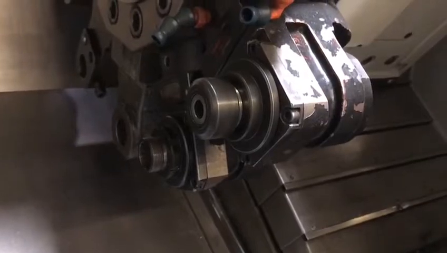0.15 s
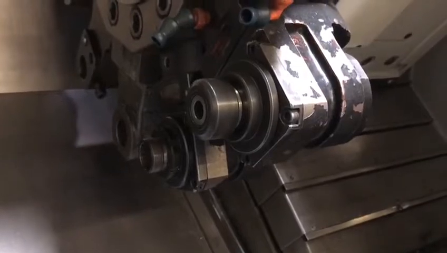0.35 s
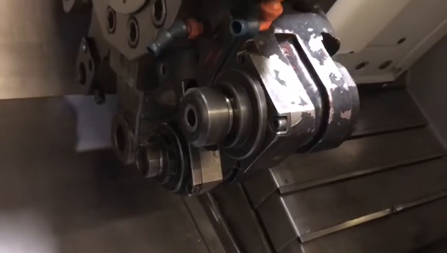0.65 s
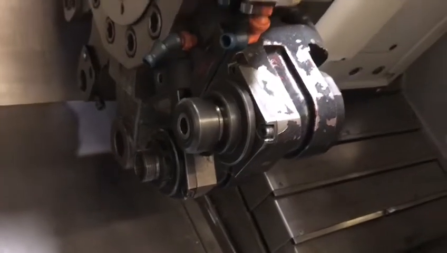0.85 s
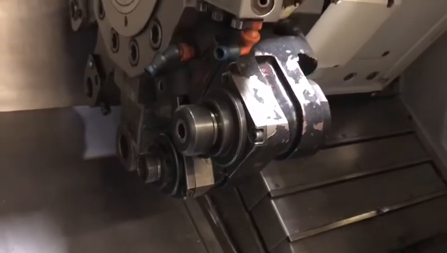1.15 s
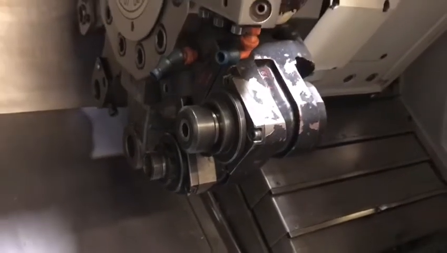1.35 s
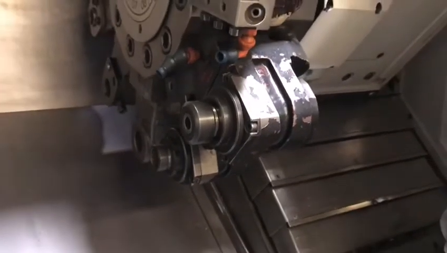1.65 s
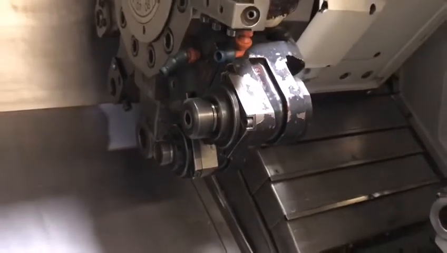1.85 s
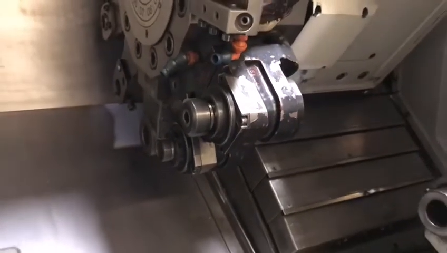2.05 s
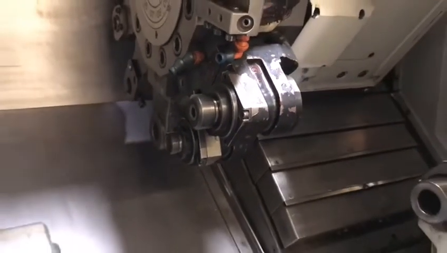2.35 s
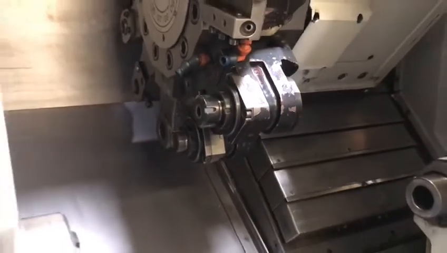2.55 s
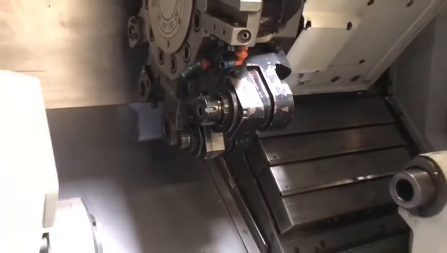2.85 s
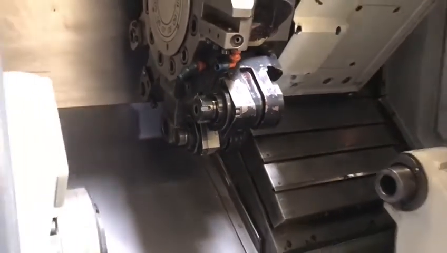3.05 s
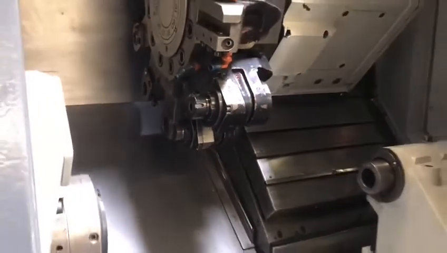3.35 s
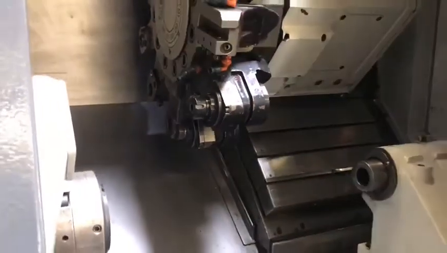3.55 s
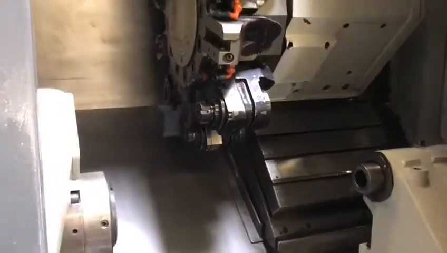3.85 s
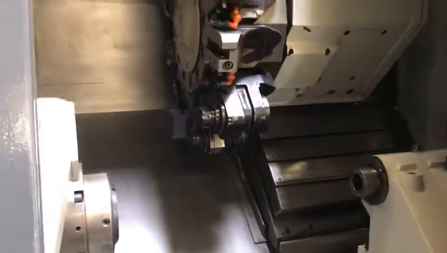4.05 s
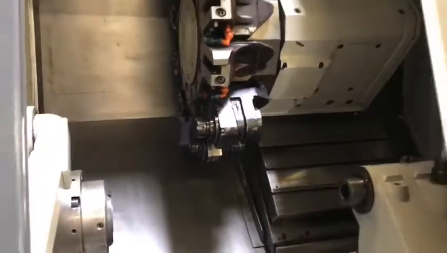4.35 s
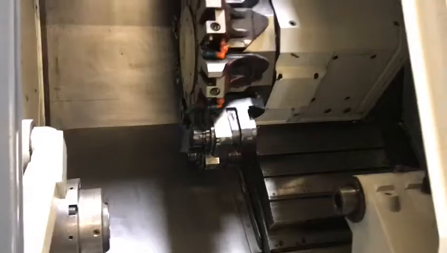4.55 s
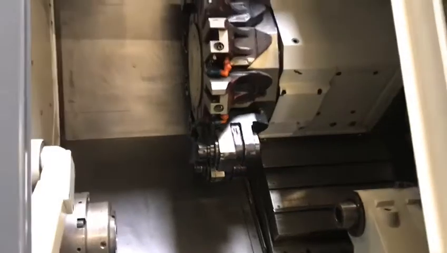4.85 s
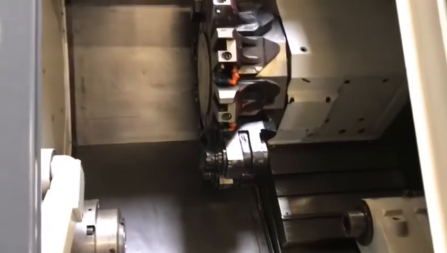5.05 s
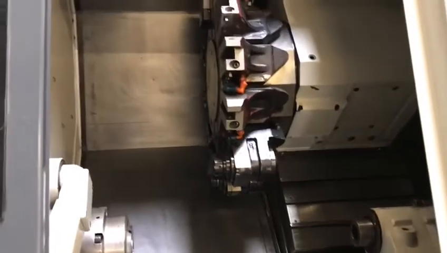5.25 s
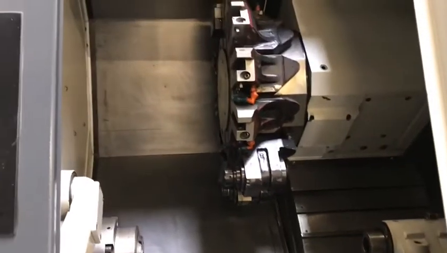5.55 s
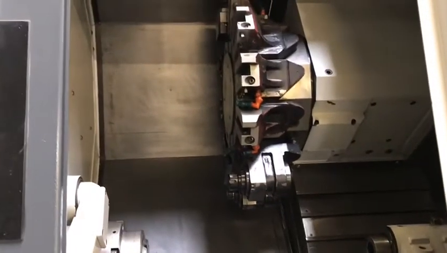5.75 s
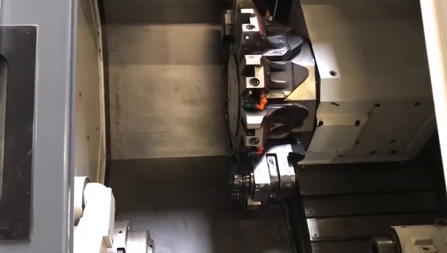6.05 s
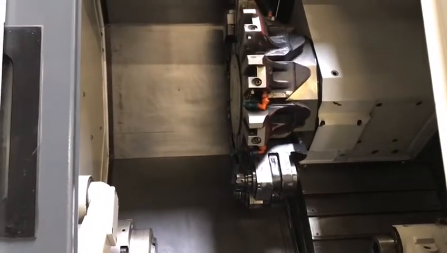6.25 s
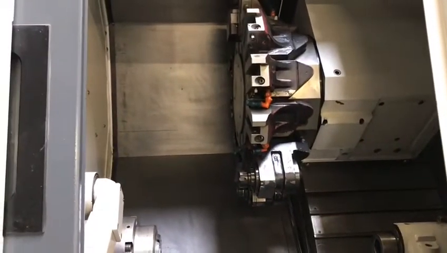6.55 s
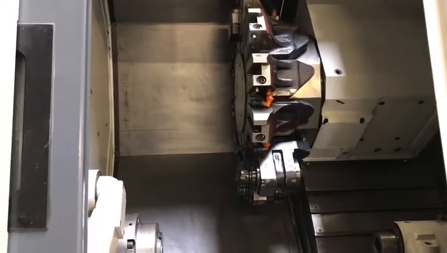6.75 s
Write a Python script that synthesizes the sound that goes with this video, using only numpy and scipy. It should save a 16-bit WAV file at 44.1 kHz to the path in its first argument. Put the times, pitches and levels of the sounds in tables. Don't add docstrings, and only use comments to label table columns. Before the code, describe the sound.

Inside a metal lathe cabin, a geared tool drive roars and whines loudly with a brief buzzing rattle. The microphone backs away, the whine sharpening, until the drive quickly moans to rest with a soft low brake thud. A steady air hiss with faint whistles remains. A sharp latch knock follows, then a valve snap as the air stops, a faint relay click, and continuing pump, fan and mains hum.

```python
import sys
import numpy as np
from scipy import signal
from scipy.io import wavfile
from scipy.ndimage import uniform_filter1d

SR = 44100
rng = np.random.default_rng(int(sys.argv[2]) if len(sys.argv) > 2 else 0)


def master_out(mix):
    frames = np.transpose(np.atleast_2d(mix))
    ceiling = np.clip(frames, -1, 1)
    pcm = np.round(ceiling * 32767).astype(np.int16)
    wavfile.write(sys.argv[1], SR, pcm)


def invert_db(level):
    return 10 ** (np.asarray(level, dtype=float) / 20)


N = 304731
HOP = 256
MOUTH_S, MOUTH_LEN_S = 0.77, 0.35
STOP_S, COAST_S = 2.345, 0.225


def tool_drive(t):
    return bearing_roar() + gear_tones(t) + mesh_whine(t) + cover_rattle(t) + coasting_moans(t)


def bearing_roar():
    # pitch_hz, level_db [dB per Hz]
    roar_close = [(24, -48), (40, -28), (341, -7.5), (590, 4), (665, -5.5), (928, 7.5), (1120, -18),
                  (1210, 3), (1610, 1), (2300, -10), (2530, -14.5), (3520, -6), (5160, -12.5), (10800, -22),
                  (11900, -30), (15400, -67), (22000, -120)]
    # pitch_hz, level_db [dB per Hz]
    roar_far = [(24, -54), (40, -38), (333, -8), (394, -16.5), (824, -9.5), (928, -12.5), (1100, -17),
                (1210, -13), (1610, -24.5), (2190, -2.5), (2350, 3.5), (2530, -1.5), (3610, -6.5),
                (11100, -22.5), (11900, -45), (15400, -73), (22000, -120)]
    # pitch_hz, width_hz, lift_db
    housing = [(420, 39, 2.5), (910, 350, -2), (1240, 90, -3), (1835, 70, 7.5), (2350, 200, 1),
               (2680, 67, 3), (3410, 300, 2), (3620, 320, 2), (10960, 320, 9)]
    far_inside, far_outside = 0.41, 0.53
    level_db, spread_share = -17.5, 0.9
    speed_power, dull_db = 0.77, -6.5
    t = frame_times()
    far = far_inside + (far_outside - far_inside) * outside(t)
    roar_db = level_db + spread_share * spread_db(t) + speed_power * 20 * np.log10(speed(t))
    octaves = np.log2(np.fft.rfftfreq(4 * HOP, 1 / SR) / 1400 + 0.055)[:, None]
    dulling_db = octaves * dull_db * (1 - speed(t)) ** 2
    colour_db = (1 - far) * colour(roar_close, housing) + far * colour(roar_far, housing)
    return noise(colour_db + roar_db + dulling_db, patchy_db=0.22, flicker_db=1.01, streak_db=2.0)


def gear_tones(t):
    # pitch_hz, level_db
    gears_close = [(65.3, -46), (129.9, -45), (259.7, -49.5), (391.6, -35), (456.9, -43), (555.8, -49),
                   (591.5, -32), (620.4, -47), (769.1, -38), (849.2, -35.5), (914.5, -38), (947.5, -32.5),
                   (1012.1, -36.5), (1201.1, -35.5), (1240.9, -34.5), (1501.9, -39), (1567.2, -48),
                   (1697.8, -40), (1763.0, -32.5), (1958.8, -35.5), (2122.4, -33.5), (2285.2, -42)]
    # pitch_hz, level_db
    gears_far = [(65.3, -53), (101.6, -54), (130.5, -50), (259.1, -46), (391.0, -37), (424.6, -46.5),
                 (456.2, -47), (528.2, -45), (591.5, -40), (619.8, -42.5), (881.5, -42), (946.8, -33.5),
                 (1012.1, -39.5), (1201.8, -39.5), (1239.5, -50), (1404.4, -44), (1468.3, -41.5),
                 (1859.3, -40.5), (2154.0, -60), (2284.5, -39.5)]
    # pitch_hz, level_db
    gears_high = [(2415.8, -49.5), (2611.6, -49), (2742.1, -41.5), (3100.8, -46.5), (3133.8, -42),
                  (3166.1, -57), (3232.0, -46.5), (3402.2, -41.5), (3656.6, -40.5), (3688.2, -40),
                  (5680.1, -47.5), (7509.7, -50), (7714.3, -51), (7752.6, -57), (8158.4, -48.5),
                  (8307.1, -53), (9089.7, -49), (9525.8, -73)]
    close = sum(tone(hz, db - 0.1, waver=0.6, rate_hz=24) for hz, db in gears_close)
    far = sum(tone(hz, db + 3.0, waver=0.41, rate_hz=18) for hz, db in gears_far)
    high = sum(tone(hz, db + 5.5, waver=0.7, rate_hz=18) for hz, db in gears_high)
    turn = outside(t) * np.pi / 2
    strength = invert_db(spread_db(t)) * speed(t) ** 2.8
    return strength * (np.cos(turn) * close + np.sin(turn) * far + high)


def mesh_whine(t):
    # time_s, level_db
    mesh = [
        (0, -28),
        (.3, -26.5),
        (.97, -28),
        (1.1, -22),
        (1.25, -20.5),
        (1.8, -21.5),
        (2.05, -24),
        (2.4, -24.5),
    ]
    unload_db, unload_s = -10.5, 0.027
    level_db = curves(mesh, t)[0] + unload_db * np.clip((t - STOP_S) / unload_s, 0, 1)
    return tone(2350.2, level_db, waver=0.07, rate_hz=25) * speed(t)


def cover_rattle(t):
    # start_s, end_s, from_hz, to_hz, level_db
    rattle = (0.3, 1.18, 905, 940, -30)
    return passing(rattle, t, waver=3.0, rate_hz=70)


def coasting_moans(t):
    # start_s, end_s, from_hz, to_hz, level_db
    moans = [
        (2.34, 2.45, 560, 515, -34),
        (2.44, 2.55, 530, 558, -34.5),
    ]
    return sum(passing(row, t, waver=0.29, rate_hz=71) for row in moans)


def air_purge(t):
    # pitch_hz, level_db [dB per Hz]
    jet_hiss = [(88, -43), (150, -8), (190, -26), (250, -5.5), (312, -20), (403, -25), (458, -18.5),
                (710, -16), (778, -17.5), (885, -10.5), (1650, -11.5), (1770, -8.5), (4420, -7),
                (11000, -20), (11900, -22.5), (15400, -65), (22000, -120)]
    # pitch_hz, width_hz, lift_db
    cabin = [(550, 49, 11.5), (6200, 490, 3), (1013, 58, 6.5), (2450, 60, 5.5), (2716, 37, 7),
             (3700, 150, 2), (4410, 980, 2.5), (5000, 440, -2), (7060, 580, 2.5), (7880, 520, -4),
             (8700, 700, 4.5), (10300, 520, -1.5), (11070, 370, 3)]
    # start_s, end_s, from_hz, to_hz, level_db
    whistles = [(3.82, 4.02, 3450, 3505, -46), (4.0, 4.26, 3580, 3645, -44), (2.6, 4.1, 2085, 2090, -55),
                (3.05, 4.5, 2395, 2450, -54), (3.8, 4.5, 3990, 3975, -54), (4.55, 5.52, 1785, 1812, -55),
                (3.4, 4.8, 2580, 2645, -54)]
    level_db, spread_share = -27, 1.115
    shut_s, shut_db_per_s, leak_db, leak_db_per_s = 5.51, -450, -21, -70
    shut = np.maximum(frame_times() - shut_s, 0)
    flow_db = np.maximum(shut_db_per_s * shut, leak_db + leak_db_per_s * shut)
    field_db = colour(jet_hiss, cabin) + level_db + spread_share * spread_db(frame_times()) + flow_db
    jet = noise(field_db, patchy_db=0.6, flicker_db=0.4, streak_db=2.3)
    return jet + sum(passing(row, t, waver=0.45, rate_hz=30) for row in whistles)


def knocks():
    # time_s, peak_db, ring_hz, fade_s [time to fall 60 dB], crack_share [0-1]
    hits = [(2.613, -28, 78, .09, .02), (4.9635, -19.5, 1150, .018, .2), (4.9633, -21, 3250, .014, .3),
            (4.965, -28, 520, .04, .1), (4.970, -28, 290, .04, 0), (4.966, -36, 130, .06, 0),
            (5.5832, -21, 3900, .006, .3), (5.5836, -26, 2900, .006, .1), (5.5832, -28, 5400, .006, .3),
            (5.5832, -24, 7000, .007, .2), (5.5832, -29, 11200, .006, .3), (5.5844, -28, 1400, .008, .1),
            (5.999, -36, 7300, .008, .6), (6.0025, -37, 9200, .007, .6), (6.058, -36, 400, .02, .05)]
    out, u = np.zeros(N), np.arange(6000) / SR
    for s, db, hz, fade_s, crack_share in hits:
        crack = rng.standard_normal(len(u)) * invert_db(-60 * u / 0.013)
        ring = (1 - crack_share) * np.sin(2 * np.pi * hz * u) + crack_share * crack
        onset = np.minimum(u * hz * 2, 1)
        at = round(s * SR)
        out[at:at + len(u)] += invert_db(db - 60 * u / fade_s) * ring * onset
    return out


def pump(t):
    # multiple, level_db, loudest_s, half_width_s, lift_db
    pump_low = [(1, -68, 2.6, 1.9, 25), (2, -59, 4.25, .9, 13), (3, -54, 3.3, .8, 2),
                (4, -74, 3.7, 1.3, 28)]
    # multiple, level_db
    pump_orders = [(5, -59), (6, -53), (7, -54), (8, -63), (10, -61), (11, -73), (14, -67), (15, -72),
                   (16, -64), (17, -71), (19, -80), (21, -77), (25, -81), (26, -78)]
    pump_hz = 385.23
    beat_hz, beat_top_s, beat_depth = 1.85, 5.8, 0.8
    one, two, three, four = (tone(pump_hz * round(k), spot_db(t, *spot), waver=0.12, rate_hz=8)
                             for k, *spot in pump_low)
    beat = 1 + beat_depth * np.cos(2 * np.pi * beat_hz * (t - beat_top_s))
    high = sum(tone(pump_hz * k, db, waver=0.15, rate_hz=5) for k, db in pump_orders)
    return one + two + three * beat + four + high


def fans(t):
    # multiple, level_db
    fan_orders = [(2, -60), (3, -55), (4, -68), (5, -71), (6, -73), (7, -78), (8, -74), (9, -78)]
    # pitch_hz, level_db, spot_s, half_width_s, lift_db
    blower_tones = [
        (258.9, -43, 1.2, 1.6, -2),
        (408.5, -54.5, 1.5, 3.1, 10),
        (821.3, -70, 2.5, 1.6, 27),
        (821.3, -50, 5.3, 1.0, 6),
    ]
    # pitch_hz, level_db
    hums = [(59, -63), (100, -61), (119.8, -54), (225, -56.5), (241, -58.5), (695.8, -61.5), (775.9, -55.5),
            (1215, -60.5), (1391, -57), (1811, -65), (3461.5, -54), (3691, -75), (3822, -72),
            (4614.8, -64.5), (5364, -73), (6922, -68), (7977, -78), (8269, -83), (8446, -79), (8999, -77)]
    fan_hz = 1111.2
    servo = sum(tone(fan_hz * k, db, waver=0.18, rate_hz=5) for k, db in fan_orders)
    blower = sum(tone(hz, spot_db(t, *spot), waver=0.29, rate_hz=12) for hz, *spot in blower_tones)
    hum = sum(tone(hz, db, waver=0.39, rate_hz=8) for hz, db in hums)
    return servo + blower + hum


def shop_noise():
    # pitch_hz, level_db [dB per Hz]
    shop = [(12, -53), (20, -25), (114, -6), (174, -13), (253, -9.5), (468, -14), (799, -10.5),
            (889, -13.5), (1730, -13.5), (2270, -17.5), (2880, -22), (3380, -21), (3670, -21), (11000, -32),
            (11900, -35), (15400, -74), (22000, -120)]
    # pitch_hz, width_hz, lift_db
    panels = [(1030, 150, 3.5), (1550, 150, 0.5), (2600, 300, 2.5), (1830, 280, -5), (4800, 300, 0),
              (7640, 520, -3), (11000, 500, 4)]
    level_db = -39 + 0.91 * spread_db(frame_times())
    return noise(colour(shop, panels) + level_db, patchy_db=1.0, flicker_db=0.0, streak_db=2.5)


def speed(t):
    return np.clip(1 - (t - STOP_S) / COAST_S, 1e-4, 1)


def outside(t):
    return np.clip((t - MOUTH_S) / MOUTH_LEN_S, 0, 1)


def spread_db(t):
    # time_s, distance_m
    distance = [
        (0, 1.05),
        (1, 1.12),
        (2.3, 1.48),
        (3, 1.88),
        (4, 2.3),
        (5.5, 2.31),
        (6.91, 2.84),
    ]
    return -20 * np.log10(curves(distance, t)[0])


def spot_db(t, db, at, half, lift_db):
    spot = np.exp(-abs((t - at) / half) ** 3)
    return db + lift_db * spot + 0.31 * spread_db(t)


def passing(row, t, waver, rate_hz):
    start, end, from_hz, to_hz, db = row
    u = np.clip((t - start) / (end - start), 0, 1)
    swell = np.sqrt(abs(np.sin(np.pi * u))) * (u < 1)
    return tone(from_hz + (to_hz - from_hz) * u, db, waver, rate_hz) * swell


def tone(hz, db, waver, rate_hz):
    steps = np.arange(0, N + SR, SR / rate_hz)
    re, im = (np.interp(np.arange(N), steps, v) for v in waver * rng.standard_normal((2, len(steps))))
    cycles = np.cumsum(hz * np.ones(N)) / SR + rng.random()
    angle = (2 * np.pi * (cycles % 1)).astype(np.float32)
    wave = np.cos(angle) * (1 + re) - np.sin(angle) * im
    return np.sqrt(2 / (1 + waver ** 2)) * invert_db(db) * wave


def noise(field_db, patchy_db, flicker_db, streak_db):
    frames = len(frame_times())
    a, b, patches, flicker, streaks = rng.standard_normal((frames, 2 * HOP + 1, 5)).T
    patches = smoothed(patches, 9, 16)
    flicker = smoothed(flicker, 120, 12)
    streaks = smoothed(streaks, 2, 90)
    unit = np.std(signal.istft(a + 1j * b, nperseg=4 * HOP, noverlap=3 * HOP)[1])
    level_db = field_db + patchy_db * patches + flicker_db * flicker + streak_db * streaks
    z = (a + 1j * b) * invert_db(level_db)
    return signal.istft(z, nperseg=4 * HOP, noverlap=3 * HOP)[1][:N] / unit


def smoothed(x, bins, frames):
    return evened(uniform_filter1d(uniform_filter1d(x, size=bins, axis=0), size=frames, axis=1))


def evened(x):
    return x / np.sqrt(np.mean(x ** 2) + 1e-20)


def colour(points, modes=()):
    hz = np.fft.rfftfreq(4 * HOP, 1 / SR)
    f, db = np.transpose(points)
    db = np.interp(np.log(hz + 1), np.log(f + 1), db)
    db = db + sum(d / (1 + (2 * (hz - f) / w) ** 2) for f, w, d in modes)
    return (db - 10 * np.log10(np.mean(invert_db(2 * db))))[:, None]


def frame_times():
    return np.arange(N // HOP + 5) * HOP / SR


def curves(rows, t):
    s, *columns = np.transpose(rows)
    return [np.interp(t, s, c) for c in columns]


def scene():
    t = np.arange(N) / SR
    mono = tool_drive(t) + air_purge(t) + knocks() + pump(t) + fans(t) + shop_noise()
    return np.array([mono, mono])


def levelled(x):
    knee_db, squeeze, recover_db_per_s = -29.5, 0.17, 27
    power_db = 10 * np.log10(abs(uniform_filter1d(x ** 2, size=3000)) + 1e-12)
    fall = np.arange(N) * recover_db_per_s / SR
    held_db = np.maximum.accumulate(power_db + fall) - fall
    over_db = np.maximum(held_db - knee_db, 0)
    return x / invert_db(squeeze * uniform_filter1d(over_db, size=1500))


def thinned_treble(hz, z):
    power = abs(z) ** 2 + 1e-20
    local = uniform_filter1d(uniform_filter1d(power, size=3, axis=0), size=2, axis=1)
    around = uniform_filter1d(uniform_filter1d(power, size=30, axis=0), size=2, axis=1)
    strictness = np.interp(hz, [3000, 7000, 12000], [0.05, 0.3, 0.42])[:, None]
    kept = np.clip(local / (strictness * around), 0, 1) ** 2.5
    edge_hz = 11780 + 160 * evened(uniform_filter1d(rng.standard_normal(z.shape[1]), size=4))
    return z * kept * invert_db(-40 * np.clip((hz[:, None] - edge_hz) / 90, 0, 1))


def ear_difference(hz, z):
    band = np.digitize(hz, np.geomspace(4200, 11800, 7))
    chosen = rng.random((z.shape[1], 8)).T < 0.013
    apart = chosen[band] * ((band > 0) * (band < 7))[:, None]
    scatter = np.exp(2j * np.pi * rng.random(z.T.shape).T)
    return invert_db(0.5) * apart * z * scatter


def low_pass(x):
    return signal.sosfilt(signal.butter(12, 12030, fs=SR, output="sos"), x)


def record(dry):
    hz, _, z = signal.stft(levelled(dry[0]), SR, nperseg=1536, noverlap=768)
    z = thinned_treble(hz, z)
    both = np.array([z, ear_difference(hz, z)])
    mid, side = signal.istft(both, SR, nperseg=1536, noverlap=768)[1][:, :N]
    return low_pass(np.array([mid + side, mid - side]))


dry = scene()
out = record(dry)
master_out(out)
```